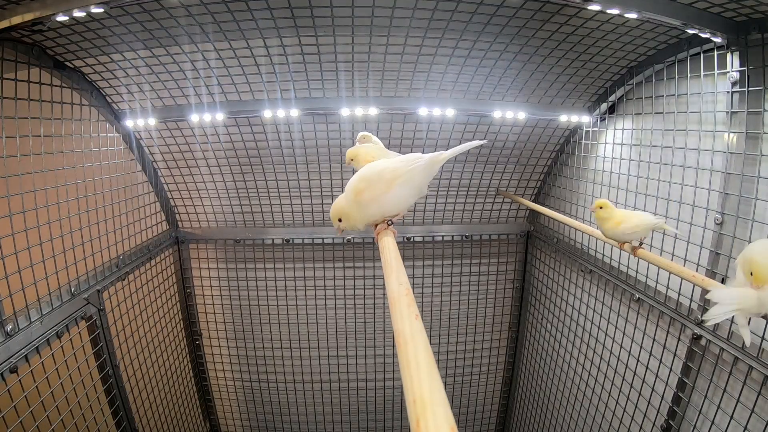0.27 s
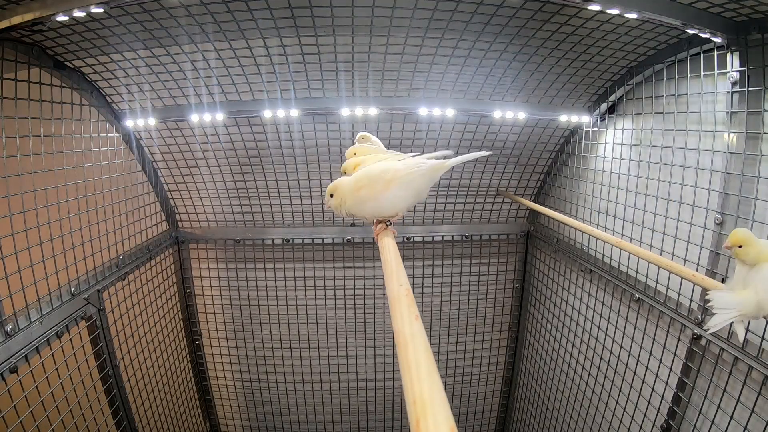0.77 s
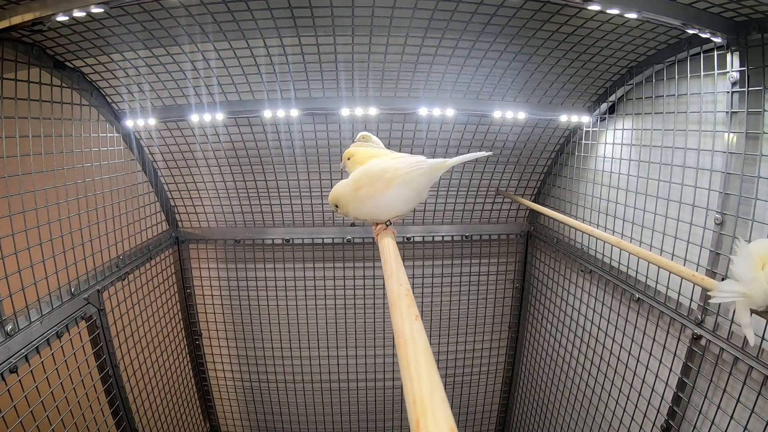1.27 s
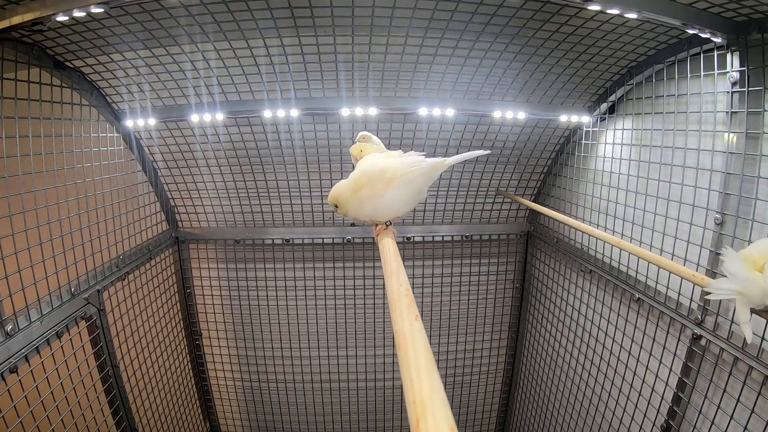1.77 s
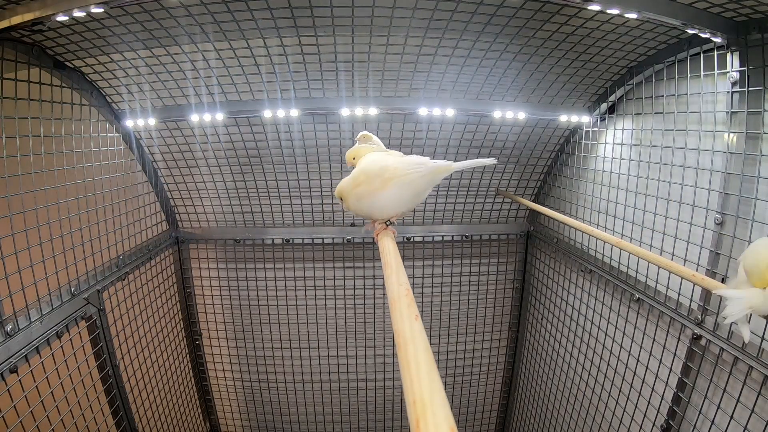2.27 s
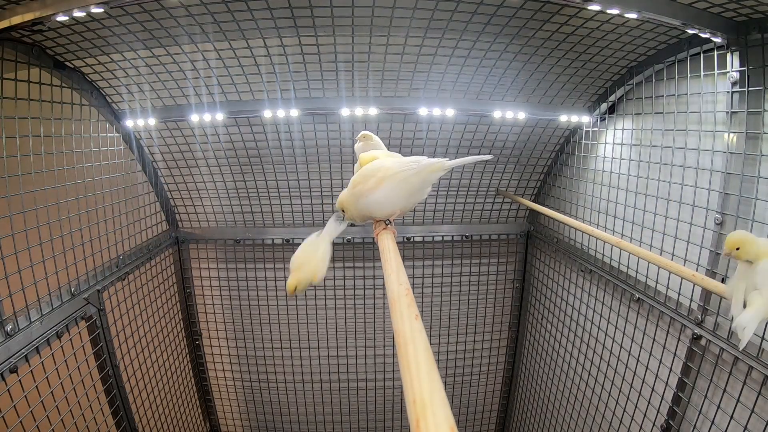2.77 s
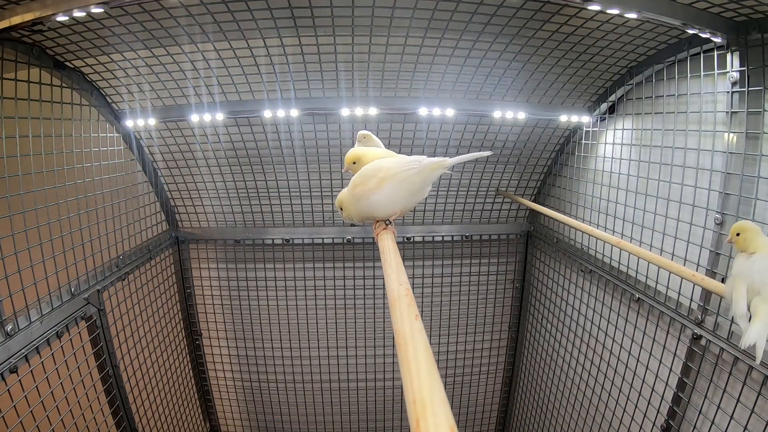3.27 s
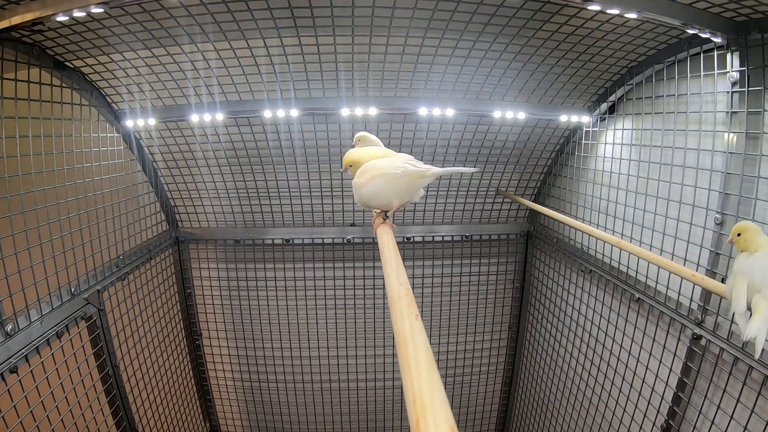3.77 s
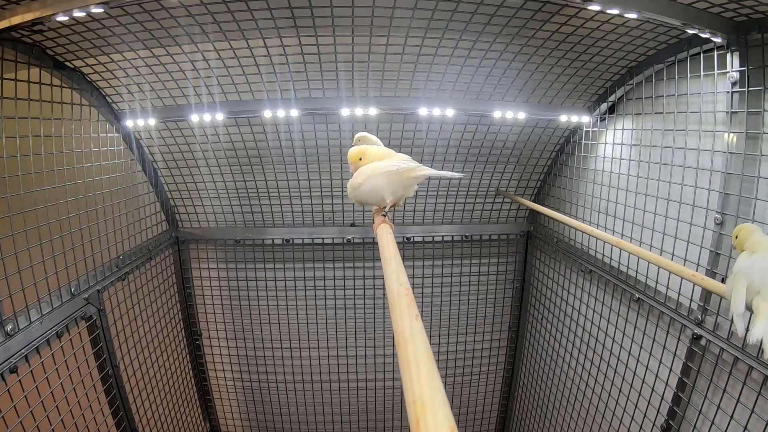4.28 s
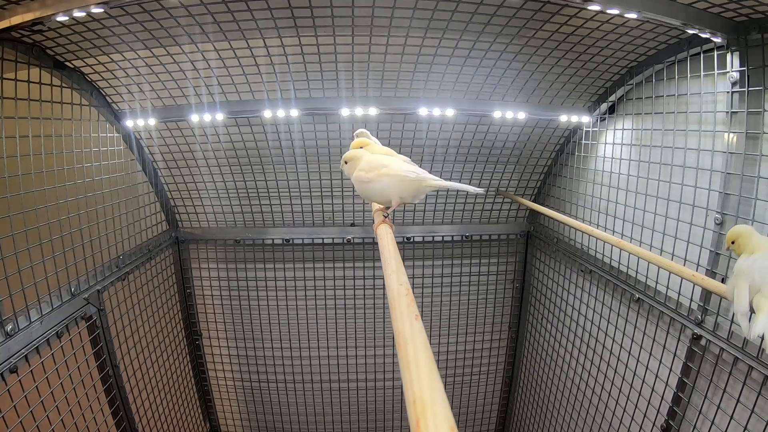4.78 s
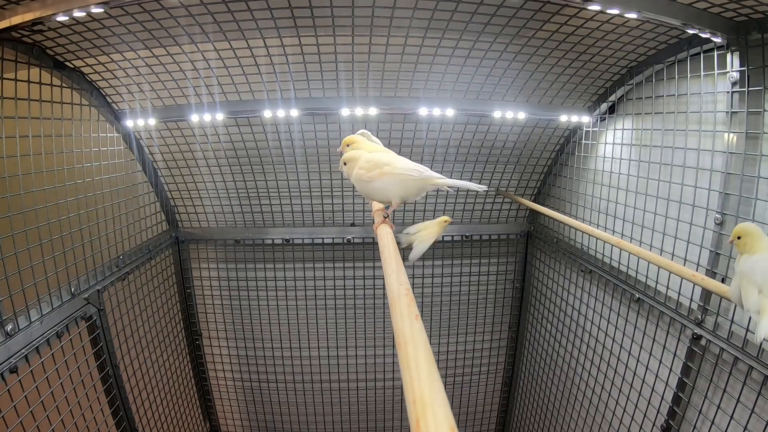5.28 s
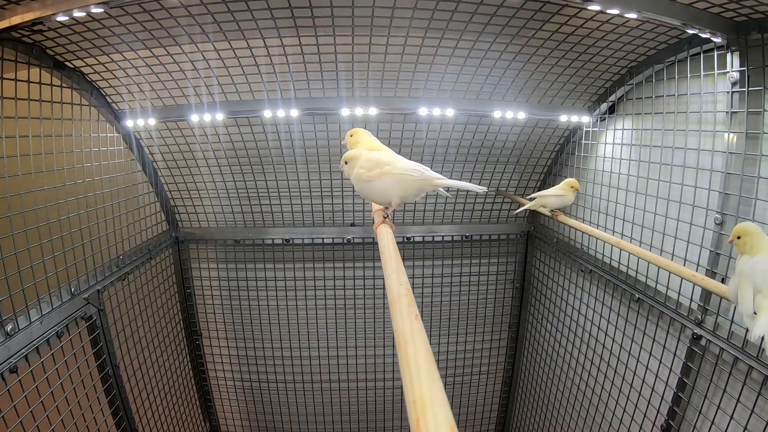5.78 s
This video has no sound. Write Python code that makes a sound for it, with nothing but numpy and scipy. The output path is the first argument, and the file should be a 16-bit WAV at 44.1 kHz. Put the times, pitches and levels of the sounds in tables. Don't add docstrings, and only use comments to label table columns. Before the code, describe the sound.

Inside an indoor wire aviary, a microphone fixed to the cage frame picks up small birds. Landings knock and rattle the mesh, strongest early on; two quick falling chirps follow. Soft flutters grow into a short burst of wingbeats, then beaks tick and jingle a thin metal feeder. A louder burst of flapping swells and fades near the end, with a final landing and light claw taps.

```python
import sys
import numpy as np
from scipy import signal
from scipy.fft import rfft, irfft, next_fast_len
from scipy.io import wavfile

SR = 44100
rng = np.random.default_rng(int(sys.argv[2]) if len(sys.argv) > 2 else 0)


def wav_record(signal):
    frames = np.transpose(np.atleast_2d(signal))
    bounded = np.clip(frames, -1, 1)
    quanta = np.round(bounded * 32767).astype(np.int16)
    wavfile.write(sys.argv[1], SR, quanta)


def amplitude_ratio(level_db):
    exponent = np.asarray(level_db, float) / 20
    return 10 ** exponent


N = 266011
TIME = np.arange(N) / SR


def rms_one(x):
    return x / np.sqrt(np.mean(x ** 2) + 1e-20)


def band(x, low_hz, high_hz):
    return signal.sosfilt(signal.butter(2, [low_hz, high_hz], "band", fs=SR, output="sos"), x)


def high_pass(x, order, hz):
    return signal.sosfilt(signal.butter(order, hz, "high", fs=SR, output="sos"), x)


def colour(x, spectrum):
    hz, db = np.transpose(spectrum)
    size = next_fast_len(N)
    grid = np.arange(size // 2 + 1) * SR / size + 1
    gain = amplitude_ratio(np.interp(np.log(grid), np.log(hz), db))
    return irfft(rfft(x, size) * gain, size)[:N]


# f/Hz, level/dB
SPREAD = [(30, 1), (200, -13), (700, 1.5), (1300, 2), (3000, -4.5), (8000, 0.5), (15000, 3.5)]


def air_noise(spectrum, side_db):
    mid, side = (rms_one(colour(w, spectrum)) for w in rng.standard_normal((2, N)))
    return np.array([mid, amplitude_ratio(side_db) * colour(side, SPREAD)])


def clicks(times, db):
    out = np.full(N, 1e-18)
    index = np.round(np.array(times) * SR).astype(int)
    out[np.clip(index, 0, N - 1)] = amplitude_ratio(db)
    return out


def grains(per_s, spread_db):
    sizes = amplitude_ratio(spread_db * np.minimum(rng.exponential(1, N), 4)) * rng.choice([-1, 1], N)
    return rms_one(sizes * (rng.random(N) < per_s / SR))


def dying(x, t60_s):
    return signal.lfilter([1], [1, -amplitude_ratio(-60 / (t60_s * SR))], x)


def ring(x, hz, t60_s):
    r = amplitude_ratio(-60 / (t60_s * SR))
    w = 2 * np.pi * hz / SR
    return signal.lfilter([0, np.sin(w)], [1, -2 * r * np.cos(w), r * r], x)


def hum(hz, width_hz):
    return rms_one(ring(rng.standard_normal(N), hz, np.log(1000) / np.pi / width_hz))


def flicker(rate_hz, db):
    slow = signal.sosfilt(signal.butter(2, rate_hz, fs=SR, output="sos"), rng.standard_normal(N))
    return amplitude_ratio(db * rms_one(slow))


# t/s, housing peak/dB, wire clatter re peak/dB, shake t60/s
KNOCKS = [(0.2695, -58, 2.5, 0.46), (0.388, -63, 8, 1), (0.4468, -49.5, 1, 0.2), (0.603, -55, 1, 0.66),
          (0.638, -52, 13.5, 0.25), (0.6451, -32, 1, 0.084), (0.675, -33.5, -7, 0.19),
          (0.6946, -47, 9.5, 0.32), (0.7279, -34.5, -4.5, 0.12), (0.992, -50.5, 3.5, 0.6),
          (1.327, -53, -2.5, 0.26), (1.35, -60, 2.5, 0.24), (1.66, -43.5, -6.5, 0.38),
          (1.679, -43, -28, 0.4), (1.802, -68, -2, 0.19), (1.8665, -37.5, 0.5, 0.19),
          (1.895, -39.5, -7, 0.58), (1.945, -45, -3, 0.14), (2.042, -50.5, 6.5, 0.22),
          (2.0727, -44, 0, 0.17), (2.433, -54.5, 1.5, 0.42), (2.655, -59.5, 3.5, 0.17),
          (2.688, -53, -8, 0.075), (2.811, -46.5, 1, 0.21), (3.175, -56.5, 10, 0.25),
          (3.706, -50.5, 0, 0.88), (3.7977, -55, 4, 0.67), (3.906, -47, 1, 0.078), (4.0251, -40, -1.5, 0.3),
          (4.7206, -58, 21, 0.085), (4.776, -41.5, 1, 0.18), (4.838, -55, 18, 0.16),
          (4.867, -49.5, 1, 0.51), (5.6083, -61, 13, 0.12), (5.6206, -42.5, -6, 0.69),
          (5.66, -56, 11, 0.31), (5.675, -49.5, 5.5, 0.15), (5.765, -68, 7, 0.19), (5.814, -62, 11, 0.26),
          (5.839, -61, 12.5, 0.31), (5.865, -45, -9.5, 0.6)]
# t/s, peak/dB, shake t60/s
JOLTS = [(.001, -55.5, 0.98), (0.774, -33.5, 0.41), (1.16, -69.5, 0.61), (1.967, -41, 0.25),
         (2.048, -44.5, 0.48), (2.0984, -36, 0.39), (2.6964, -40.5, 0.56), (3.568, -62, 0.18),
         (3.591, -48.5, 0.84), (3.733, -48, 0.45), (4.058, -52, 0.36), (4.271, -54, 1),
         (4.799, -37.5, 0.47)]


def blows():
    jolt_clatter_db = -11
    return np.array(KNOCKS + [(s, db, jolt_clatter_db, t60) for s, db, t60 in JOLTS])


def shakes(db):
    rise_s = 0.00091
    out = np.zeros(N)
    for (s, _, _, t60_s), gain in zip(blows(), amplitude_ratio(db)):
        start = round(s * SR)
        age = TIME[start:][:SR] - s
        out[start:][:SR] += gain * amplitude_ratio(-60 * age / max(t60_s, .03)) * np.minimum(age / rise_s, 1)
    return out


# f/Hz, level/dB, t60/s, side over mid/dB
HOUSING = [(1170, -30, 0.041, 29), (1238.3, 0, 0.081, 20), (1291, -0.5, 0.086, 19), (1325.7, -1, 0.13, 23),
           (1400, 0, 0.079, -9), (1380, -3, 0.087, 18), (1398, -1, 0.1, -4)]


def housing(tremble_db):
    s, peak_db = blows().T[:2]
    buzz = (0.0076 * shakes(peak_db) + 0.0028 * amplitude_ratio(tremble_db)) * rng.standard_normal(N)
    luck_db = rng.normal(0, 3.9, (len(HOUSING), len(s)))
    out = np.zeros((2, N))
    for (hz, db, t60_s, side_db), mode_luck_db in zip(HOUSING, luck_db):
        strike = 0.048 * ring(clicks(s, peak_db + mode_luck_db - 9.5), 1415, 0.0056)
        out += ring(strike + buzz, hz, t60_s) * amplitude_ratio([[db], [db + side_db]])
    out[0] = np.roll(out[0], 9)
    clamped = band(out, 1158, 1517)
    swell = [.018 * ring(out[0], 1281.0, 0.039), 0.016 * ring(out[1], 1257.0, 0.018)]
    return 0.41 * clamped + swell


# f/Hz, width/Hz, level/dB
WIRE = [(494, 50, -11), (765, 35, -19), (1557, 15, -11.5), (1858, 75, -7), (2225, 35, -8), (2454, 62, -3.5),
        (3420, 42, -10), (4200, 66, -13), (4700, 45, -19)]
# f/Hz, width/Hz, level/dB
FAR_WIRE = [(1724, 44, -15), (1910, 38, -2.5), (2005, 52, -2), (2495, 32, -16.5), (2747, 29, -6),
            (2880, 71, -4.5), (3040, 100, -6), (3490, 21, -12), (3676, 33, -11), (4560, 80, -12.5)]
# from t/s, far share/0-1
SHAKEN = [(0, 0.65), (0.6, 0.3), (0.72, 0.15), (0.9, 0.7), (1.3, 0.8), (1.6, 0.83), (1.86, 0.67), (2.03, 1),
          (2.4, 1), (2.6, 0.33), (3.1, 0.16), (4.7, 0.3), (5.6, 0.23), (5.75, 0.5)]
# f/Hz, density/dB
CLATTER = [(300, -3), (700, -41), (1500, 8), (3000, 9.5), (5000, -1), (8000, -6), (14000, -114)]


def wires():
    s, peak_db, clatter_db = blows().T[:3]
    shake = shakes(peak_db + clatter_db - 8)
    strike = clicks(s, peak_db + clatter_db + 7.5)
    rattles = np.array([strike + shake * grains(1500, 1.3) for _ in range(2)])
    since_s, far = np.transpose(SHAKEN)
    far = np.clip(far, 0, 1)[np.searchsorted(since_s, TIME, "right") - 1]
    shares = [np.sqrt(1 - far)] * len(WIRE) + [np.sqrt(far)] * len(FAR_WIRE)
    modes = WIRE + FAR_WIRE
    luck = amplitude_ratio(2 * rng.standard_normal((len(modes), len(s))))
    latest = np.searchsorted(np.sort(s), TIME + 1 / SR) - 1
    panels = np.zeros((2, N))
    for (hz, width_hz, db), share, mode_luck in zip(modes, shares, luck):
        drive = rattles * share * mode_luck[latest]
        panels += amplitude_ratio(db) * np.sqrt(width_hz) * ring(drive, hz, 2.55 / width_hz)
    blur = shake * flicker(45, 0.43) * air_noise(CLATTER, side_db=1)
    return amplitude_ratio(-44.5) * panels + amplitude_ratio(-8.0) * blur


# first t/s, last t/s, first thump/dB, last thump/dB
FLIGHTS = [
    (0.394, 0.517, -56.5, -55),
    (2.699, 2.844, -57, -53),
    (3.002, 3.117, -47.5, -28),
    (3.175, 3.281, -30, -25),
    (3.336, 3.439, -37, -33.5),
    (4.802, 4.993, -26, -24),
    (5.036, 5.348, -20, -38),
    (5.412, 5.606, -34.5, -56),
]
BEATS_PER_RUN = [3, 4, 3, 3, 3, 5, 7, 5]
# f/Hz, level/dB, t60/s
CAVITY = [(65.8, -13, 0.72), (83.6, 5.5, 0.32), (121, -16.5, 0.15)]
# f/Hz, density/dB
SWISH = [(590, -17), (1000, -11.5), (1190, 0), (1990, -6.5), (3000, -4.5), (4860, -9), (7090, -8.5),
         (10400, -14.5), (11500, -25.5), (13800, -30.5), (15500, -39)]
# f/Hz, density/dB
WASH = [(75, -2), (140, 4), (240, -0.5), (400, -1), (700, -1.5), (1200, -6.5), (2500, -12), (5000, -40.5)]
# t/s, level/dB
GUST = [(0.0, -74), (0.39, -78), (0.54, -53), (0.62, -90), (0.67, -51.5), (1.34, -76), (1.44, -69),
        (1.68, -76), (1.96, -65.5), (2.69, -75), (3.11, -50), (3.53, -56.5), (3.59, -66), (4.3, -57.5),
        (4.57, -78), (4.84, -51.5), (5.48, -48), (6.03, -64)]
# f/Hz, density/dB
DRAUGHT = [(10, -2.5), (25, -10.5), (50, -2), (85, -16.5), (120, -22), (300, -71)]


def wings(swish_gain, wash_gain):
    runs = [np.linspace(run[::2], run[1::2], count).T for run, count in zip(FLIGHTS, BEATS_PER_RUN)]
    s, thump_db = np.hstack(runs)
    stroke = signal.lfilter(np.hanning(330) / 165, 1, clicks(s, thump_db))
    puff = high_pass(stroke * 100, 2, 35)
    boom = sum(amplitude_ratio(db) * ring(stroke, hz, t60_s) for hz, db, t60_s in CAVITY)
    thump = amplitude_ratio(-39) * puff + amplitude_ratio(-8.5) * boom

    accent_db = 3.5
    beat = signal.lfilter(np.hanning(400) / 200, 1, dying(clicks(s, 0), 0.099))
    lift = 1 + (amplitude_ratio(accent_db) - 1) * beat
    quills = rms_one(band(band(grains(460, 4.6), 3500, 11400), 2500, 12500))
    crackle = amplitude_ratio(-25.0) * quills * [[1], [-.3]]
    swish = swish_gain * (flicker(24.3, 1.92) * air_noise(SWISH, side_db=-1.0) + crackle)

    wash = amplitude_ratio(-6.0) * wash_gain * flicker(21.0, 1.02) * air_noise(WASH, side_db=-5.0)
    modes = hum(329.6, 1.4) + 0.85 * hum(364.3, 13.0) + 0.43 * hum(565, 22) + 0.66 * hum(704.0, 30)
    modes = amplitude_ratio(-17.0) * wash_gain * modes
    wash += [modes, 0.9 * np.roll(modes, 33) - .12 * modes]

    gust_s, gust_db = np.transpose(GUST)
    gust = amplitude_ratio(np.interp(TIME, gust_s, gust_db) + 2.0)
    draught = gust * flicker(3.6, 2.84) * air_noise(DRAUGHT, side_db=-9.0)
    return np.array([thump, 0.077 * np.roll(thump, 150)]) + lift * (swish + wash) + draught


# peak t/s, swell/s, settle/s, swish/dB, wash re swish/dB
STIRS = [(.455, 0.033, 0.71, -60.5, -15), (.54, 0.17, 0.12, -61.5, 3), (.65, 0.01, 1, -66, 8.5),
         (.99, 0.036, 0.097, -81, 4), (1.36, 0.098, 0.47, -73, -14), (1.88, 0.028, 1, -71.5, 11),
         (2.15, 0.083, 0.13, -65, 5), (2.45, 0.017, 0.26, -88, -5), (2.719, 0.34, 0.19, -85, -11),
         (2.818, 0.061, 0.12, -58.5, -26), (2.941, 0.014, 0.86, -62.5, -10), (3.125, 0.38, 0.95, -59, -1),
         (3.18, .01, .25, -61.5, 9.5), (3.24, 0.073, 0.46, -59, 10.5), (3.3, 0.2, 0.55, -58, 12.5),
         (3.61, 0.21, 0.57, -70.5, 17), (4.001, 0.7, 0.38, -57.5, 1.5), (4.3, 0.1, 0.37, -62, 4),
         (4.52, 0.2, 0.077, -71.5, 11.5), (4.724, 0.024, 0.79, -54, 4), (4.777, 0.012, 0.77, -53.5, 11),
         (4.93, 0.15, 0.9, -57.5, 12.5), (5.14, 0.35, 0.06, -64.5, 17.5), (5.369, 0.4, 0.088, -59, 9),
         (5.49, 0.058, 0.63, -59.5, 1), (5.65, 0.15, 0.28, -57, -3), (5.86, 0.15, 0.042, -70, 1)]


def bustle():
    calm_swish_db, calm_wash_db = -82.5, -75
    swish, wash = amplitude_ratio(calm_swish_db), amplitude_ratio(calm_wash_db)
    coarse = TIME[::32]
    for s, swell_s, settle_s, db, wash_db in STIRS:
        before = (s - coarse) / max(swell_s, .01)
        after = (coarse - s) / max(settle_s, .01)
        gain = amplitude_ratio(db - 20 * np.maximum(before, after))
        swish = np.hypot(swish, gain)
        wash = np.hypot(wash, gain * amplitude_ratio(wash_db))
    return np.interp(TIME, coarse, swish), np.interp(TIME, coarse, wash)


# t/s, frame thud/dB, perch bounce/dB, sway/dB
LANDINGS = [(0.02, -51.5, -79, -53), (0.2725, -69, -88, -88), (0.478, -51.5, -75, -82),
            (0.645, -39.5, -43, -45.5), (0.6744, -58, -33.5, -43), (0.776, -39, -37, -65),
            (1.0363, -53, -54, -62), (1.503, -82, -88, -55.5), (1.882, -53.5, -90, -52),
            (2.0365, -60, -66, -50.5), (2.4379, -48.5, -88, -50.5), (2.698, -64, -52.5, -52),
            (3.738, -57, -51.5, -67), (3.7995, -53, -56.5, -75), (3.907, -47.5, -61, -84),
            (4.0248, -51, -49.5, -58.5), (4.2673, -70, -54, -69), (4.774, -66, -45, -78),
            (4.8662, -60, -40, -43.5), (5.437, -75, -69, -43), (5.621, -62, -49, -72),
            (5.678, -49, -56, -65), (5.867, -50.5, -54, -70)]
# f/Hz, level/dB, t60/s
FRAME = [(151, -5.5, 1), (210, 1, 0.17), (328.2, -1, 0.34)]


def frame(wash):
    bounce_hz, bounce_t60_s = 92.3, 0.59
    rest_db, build_s, sway_t60_s, from_wash_db = -64, 0.05, 0.94, -5
    s, thud_db, bounce_db, sway_db = np.transpose(LANDINGS)
    thud = sum(amplitude_ratio(db) * ring(clicks(s, thud_db), hz, t60_s) for hz, db, t60_s in FRAME)
    bounce = ring(clicks(s, bounce_db - 0.5), bounce_hz, bounce_t60_s)
    thud = signal.lfilter(np.hanning(200) / 100, 1, high_pass(thud, 3, 125) + bounce)
    mid, side = [hum(188.0, 11.3) + amplitude_ratio(-5.0) * hum(164.3, 27) for _ in range(2)]
    side = 0.5 * side - .45 * mid + .65 * np.roll(mid, 59)
    sway = band(np.array([mid, side]), 126.4, 251)
    push = clicks(s, sway_db)
    swing = dying(push, sway_t60_s) - dying(push, 7 * build_s)
    swing = amplitude_ratio(rest_db) + swing + amplitude_ratio(from_wash_db) * wash
    return np.array([thud, -amplitude_ratio(5.0) * np.roll(thud, 60)]) + amplitude_ratio(-4.0) * swing * sway


# t/s, peak/dB, claw re peak/dB
STEPS = [(0.276, -71.5, 10), (0.389, -73, 11), (2.07, -55, -13), (3.569, -49.5, -18.5), (3.702, -50, -4),
         (4.024, -54.5, -1), (4.269, -60.5, 5.5), (5.622, -46, 7), (5.686, -61, -13), (5.759, -59, -2),
         (5.867, -56.5, 2)]
# f/Hz, level/dB, t60/s
PERCH = [(325, -11, 0.47), (489.5, -2, 0.35), (706.5, 1, 0.22), (804, -6, 0.053), (900, -1, 0.17),
         (1436, 9, 0.12), (1800, 9.5, 0.061)]


def perch():
    s, peak_db, claw_db = np.transpose(STEPS)
    luck_db = rng.normal(0, 2.2, (len(PERCH), len(s)))
    rough = grains(900, 1.0)
    wood = np.zeros(N)
    for (hz, db, t60_s), mode_luck_db in zip(PERCH, luck_db):
        blow = clicks(s, peak_db + mode_luck_db - 11 + claw_db * (hz > 1200))
        scuff = amplitude_ratio(-26.5) * dying(blow, 0.42) * rough
        wood += amplitude_ratio(db) * ring(blow + scuff, hz, t60_s)
    slap = dying(clicks(s, peak_db + 11), .1) * rng.standard_normal(N)
    wood += band(slap, 600, 2000)
    return signal.lfilter(np.hanning(14) / 8.1, 1, wood) * [[1], [-.4]]


# t/s, f/Hz, peak/dB, t60/s
RAPS = [(0.644, 4550, -47, 0.042), (0.644, 2440, -38, 0.064), (0.662, 4500, -47, .03),
        (0.693, 2650, -45, .06), (0.706, 3500, -48, 0.06), (0.726, 3520, -50, 0.047),
        (0.773, 4200, -58, 0.029), (0.776, 2530, -49, .06), (1.6608, 2940, -53.5, 0.058),
        (1.6608, 2010, -55, 0.05), (1.8035, 2440, -64, 0.061), (1.9521, 2070, -53, .05),
        (2.0679, 2007, -47, .06), (1.8665, 3630, -45.5, 0.069), (1.8665, 2820, -46, 0.092),
        (2.05, 3590, -50.5, 0.13), (3.568, 913, -48, 0.057), (3.569, 480, -54, .05),
        (3.586, 950, -49, 0.061), (3.702, 940, -44.5, 0.035), (3.702, 1350, -53, .06),
        (3.721, 1333, -49, .06), (3.786, 1294, -50, 0.066), (4.2662, 1170, -54.5, 0.21),
        (4.7203, 1880, -49, 0.075), (4.7258, 2720, -48, 0.036), (4.7753, 1140, -38.5, 0.051),
        (4.777, 2220, -43.5, .05), (4.783, 2810, -45, 0.044), (4.8854, 900, -45, 0.046),
        (3.175, 720, -48, .04), (3.176, 1250, -48, 0.032), (3.229, 720, -46.5, .04), (3.277, 630, -45, .06),
        (3.279, 1200, -44, .04), (3.323, 600, -47, .05), (4.795, 1300, -42, .12), (4.815, 1284, -41, .12),
        (5.621, 680, -51, .15), (5.647, 473, -50.5, .12), (5.687, 690, -51, .12), (5.871, 1312, -48, 0.19)]


def raps():
    rise_s = 0.0011
    out = np.zeros(N + SR)
    age = TIME[:SR // 4]
    for s, hz, db, t60_s in RAPS:
        pair = np.sin(2 * np.pi * hz * age) + 0.26 * np.sin(2 * np.pi * 1.09 * hz * age)
        fall = amplitude_ratio(db - 60 * age / max(t60_s, .01)) * np.minimum(age / rise_s, 1)
        out[round(s * SR):][:SR // 4] += fall * pair
    return out[:N]


# t/s, peak/dB, ring re peak/dB, tilt/(dB/octave)
PECKS = [(3.536, -62.5, 3.5, 23), (3.633, -46.5, -11, 4), (3.7226, -61, -21, 1), (3.784, -45.5, -6, 5),
         (3.824, -45.5, -6.5, 1), (3.826, -41.5, -10, 0), (3.898, -50, -5, 10), (3.9196, -49.5, -7, -7),
         (3.956, -38.5, -8, 6), (3.9994, -67, -25, 10), (4.044, -48.5, -7.5, -6), (4.18, -62, -8, 17),
         (4.222, -49.5, -5, 13), (4.2656, -43, -6.5, -2.5), (4.361, -56, -10, 12), (4.512, -48, -6.5, 8),
         (5.765, -46, -10.5, -4.5), (5.841, -40, -55, 3)]
# t/s, peak/dB
TICKS = [
    (0.343, -53.5),
    (0.6365, -42),
    (1.3428, -59),
    (1.426, -65),
    (4.726, -39.5),
    (4.752, -38),
    (4.8379, -40),
    (5.458, -49),
]
# f/Hz, width/Hz, level/dB
FEEDER = [(3290, 48, 0), (3500, 65, 1), (3880, 35, -1), (4290, 50, -1), (4940, 41, -2.5), (5715, 30, -1.5),
          (6490, 65, -6), (7170, 36, -1.5), (7960, 58, -3), (8560, 81, -1), (8850, 42, 1), (9760, 40, -4),
          (10100, 47, -2), (10670, 70, -8)]


def feeder():
    tick_ring_db = -18
    strikes = PECKS + [(s, db, tick_ring_db, 0) for s, db in TICKS]
    s, peak_db, ring_db, tilt_db = np.transpose(strikes)
    crack = dying(clicks(s, peak_db - 0.5), 0.024) * rng.standard_normal(N)
    out = band(band(crack, 5800, 9800), 3500, 10500)
    seeds = dying(clicks(s, peak_db + ring_db - 23.0), 0.09) * grains(2800, 3.8)
    out += band(seeds, 2800, 10500)
    luck_db = rng.normal(0, 1.5, (len(FEEDER), len(s)))
    jingle = grains(400, 1.4)
    for (hz, width_hz, db), mode_luck_db in zip(FEEDER, luck_db):
        blow = clicks(s, peak_db + ring_db + mode_luck_db - 14.5 + tilt_db * np.log2(hz / 8000))
        blow = 0.92 * blow + amplitude_ratio(-18.0) * dying(blow, 0.2) * jingle
        for split in (.996, 1.003):
            out += amplitude_ratio(db - 7.0) * ring(blow, hz * split, 1.7 / width_hz)
    return out + shivers(jingle)


# t/s, length/s, f/Hz, level/dB, t60/s
SHIVERS = [(3.823, .13, 7170, -57, 1.3), (3.826, .22, 6490, -59.5, 1.8), (3.83, .12, 4290, -64, .5),
           (3.955, .16, 9000, -60, 0.48), (3.956, .225, 7170, -60, 1), (3.96, .12, 5715, -69, .8),
           (4.044, .11, 6480, -62.5, 0.94), (4.267, .16, 6490, -61, 1), (4.27, .05, 10860, -62, 0.36),
           (3.825, .04, 10550, -64, .4), (4.267, .18, 8880, -62, 0.81), (4.33, .07, 5690, -69, 0.7),
           (4.268, .1, 7390, -68, .6), (3.96, .12, 7960, -65, .8), (5.764, .05, 6600, -57, 0.28),
           (5.764, .08, 4330, -64, 0.29)]


def shivers(jingle):
    width_hz = 45
    out = np.zeros(N + SR)
    age = TIME[:SR]
    for k, (s, length_s, hz, db, t60_s) in enumerate(SHIVERS):
        swing = amplitude_ratio(db - 24.0 - 60 * age / max(t60_s, .05)) * (age < length_s)
        taps = jingle[k * SR // 4:][:SR] * swing
        out[round(s * SR):][:SR] += ring(taps + 1e-18, hz, 1.64 / width_hz)
    return out[:N]


# t/s, length/s, first f/Hz, settled f/Hz, level/dB
CHIRPS = [
    (0.972, 0.027, 3516, 3216, -55.5),
    (0.98, 0.012, 3150, 2790, -59),
    (0.984, 0.022, 2870, 2390, -58),
    (0.972, 0.014, 3760, 3610, -56),
    (0.995, 0.053, 2150, 1767, -54.5),
    (1.065, 0.027, 1800, 1747, -56),
    (1.323, 0.0098, 4500, 4270, -59.5),
    (1.329, 0.015, 4200, 3260, -54.5),
    (1.341, 0.012, 3200, 3000, -59.5),
]


def chirps():
    warble_hz, warble_peak_s, warble_fade_s = 180, .9808, .018
    husk_depth, warble_depth = 0.166, 0.27
    glide_share, edge_s = .19, 0.0016
    swell_db_per_khz = 7
    out = np.zeros(N)
    warble = np.cos(2 * np.pi * warble_hz * (TIME - warble_peak_s))
    husk = np.log(flicker(490, 0.93)) * 0.39
    near_peak = np.exp(-np.abs(TIME - warble_peak_s) / warble_fade_s)
    depth = np.clip(husk_depth + warble_depth * near_peak, 0, 1)
    for s, length_s, first_hz, settled_hz, db in CHIRPS:
        age = np.clip(TIME - s, 0, length_s)
        hz = settled_hz + (first_hz - settled_hz) * np.exp(-age / (glide_share * length_s))
        wavering_hz = hz * (1 - depth * (0.13 * warble + husk * hz / 1900))
        phase = np.cumsum(wavering_hz) * 2 * np.pi / SR
        sounding = np.clip(np.minimum(age, length_s - age) / edge_s, 0, 1)
        level = np.sqrt(2) * amplitude_ratio(db - swell_db_per_khz * (hz - settled_hz) / 1000)
        out += sounding * level * (1 + depth * warble) * np.sin(phase)
    return out


def room(x):
    t60_s, rise_s = 0.49, 0.002
    age = TIME[:SR]
    tail = rng.standard_normal((2, SR)) * amplitude_ratio(-60 * age / t60_s) * np.minimum(age / rise_s, 1)
    tail /= np.sqrt(np.sum(tail ** 2, axis=1, keepdims=True))
    return signal.fftconvolve(x[None], tail, axes=1)[:, :N]


# f/Hz, density/dB
HUSH = [(130, -41), (220, 13), (287, -72), (343, -40), (575, -57), (699, 17.5), (1090, -4.5), (1260, 11.5),
        (2070, -4.5), (2800, -51), (6020, -63), (6820, 0), (7860, -99), (10300, -11), (15500, -64)]


def hush():
    return amplitude_ratio(-75) * air_noise(HUSH, side_db=4.5)


# f/Hz, level/dB
LEAN = [(30, -0.3), (125, -0.73), (500, -0.9), (1300, -0.26), (3000, -0.93), (9000, -1.6), (13000, 2.5)]


def left_right(mid, side):
    mirrored = [(hz, -db) for hz, db in LEAN]
    return np.array([colour(mid + side, LEAN), colour(mid - side, mirrored)])


def scene():
    swish, wash = bustle()
    voiced, rapped = chirps() + feeder(), raps()
    near = housing(tremble_db=-70.5) + wires() + perch() + frame(wash) + wings(swish, wash)
    near += (voiced + rapped) * amplitude_ratio([[.1], [-9]])
    echoes = amplitude_ratio(-1.5) * room(voiced + amplitude_ratio(-10) * rapped) * amplitude_ratio([[.1], [-3]])
    stirred = echoes * amplitude_ratio(-1.0) * flicker(90, 2.5)
    mid, side = near + hush() + stirred
    return left_right(mid, side)


def band_limit(x):
    return signal.sosfilt(signal.butter(12, 15610, fs=SR, output="sos"), x)


def record(dry):
    cut = signal.sosfilt(signal.cheby2(10, 50, 16000, fs=SR, output="sos"), dry)
    return band_limit(cut)


dry = scene()
out = record(dry)
wav_record(out)
```